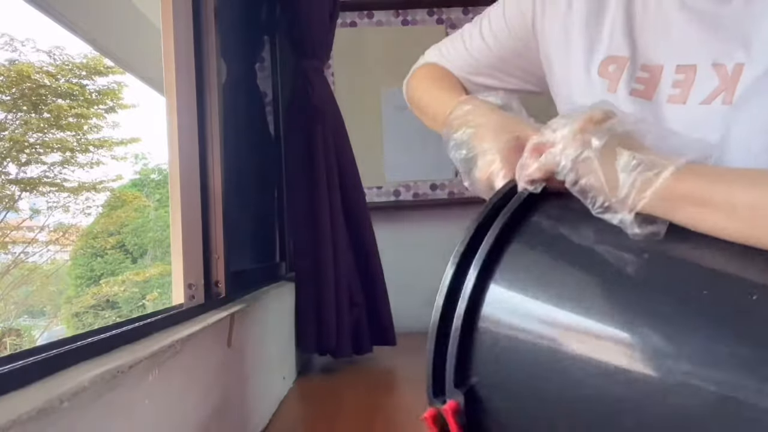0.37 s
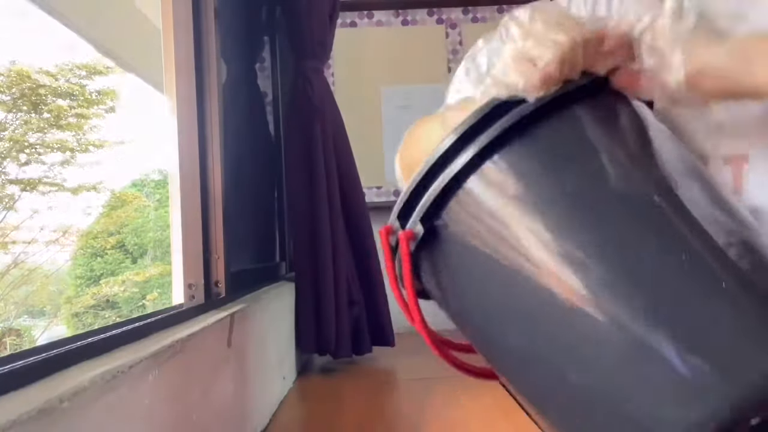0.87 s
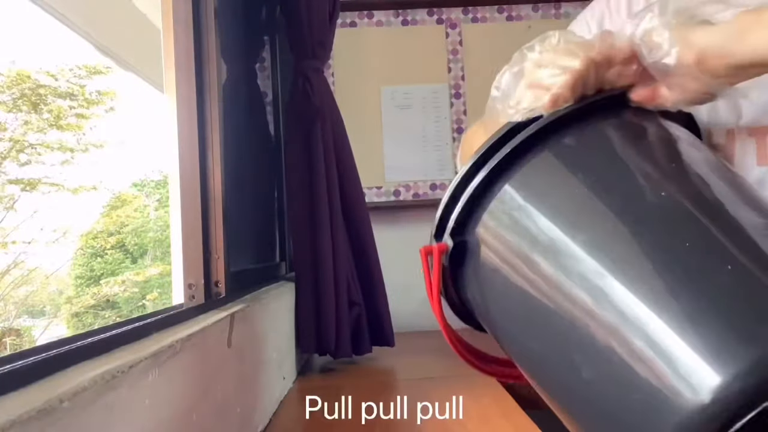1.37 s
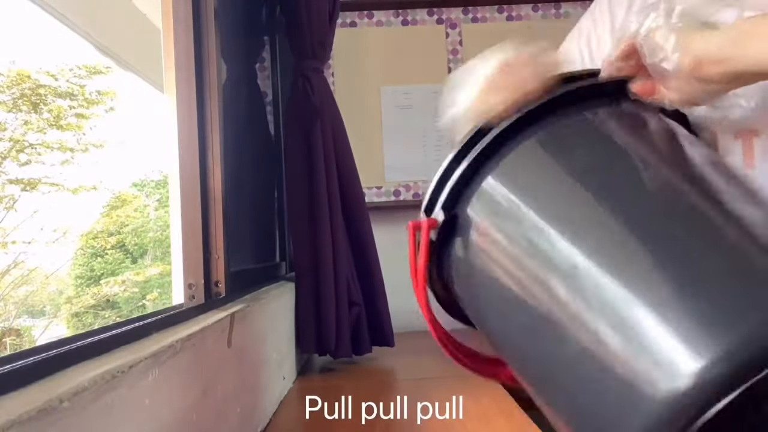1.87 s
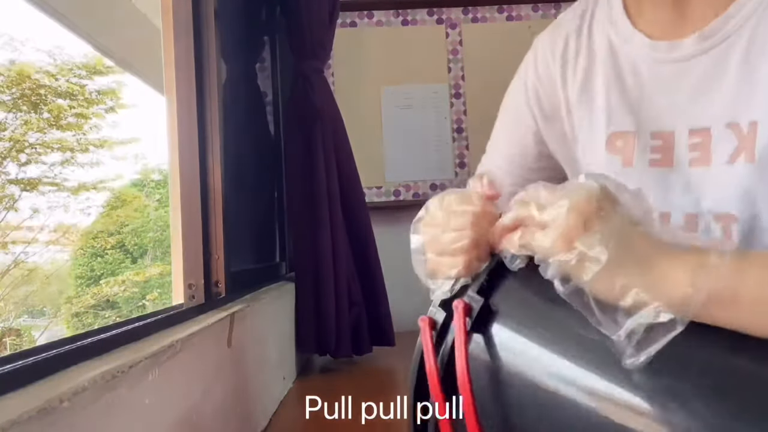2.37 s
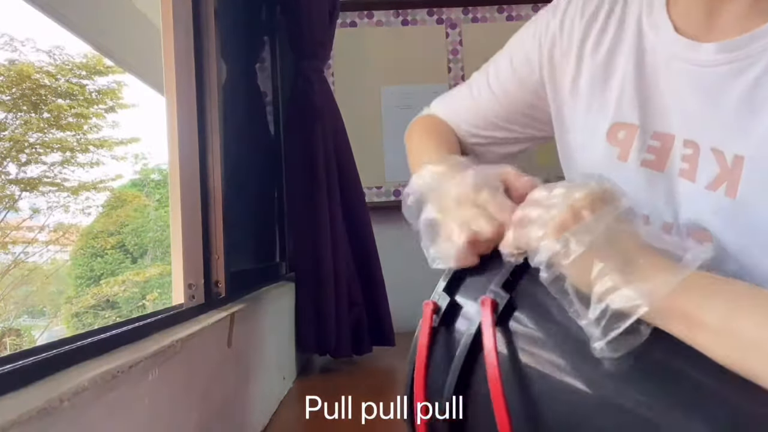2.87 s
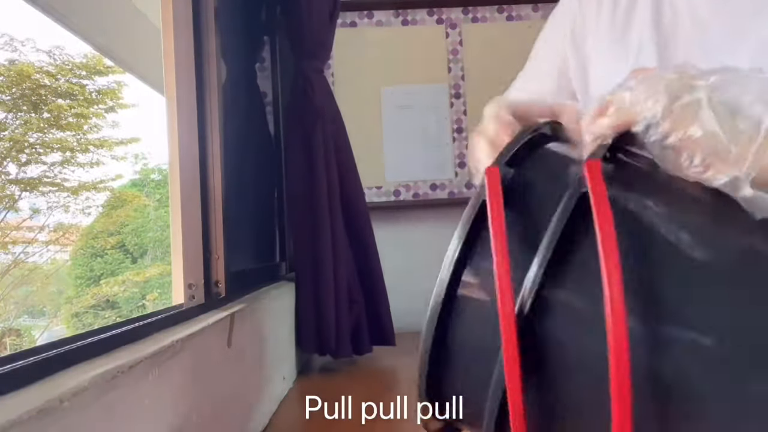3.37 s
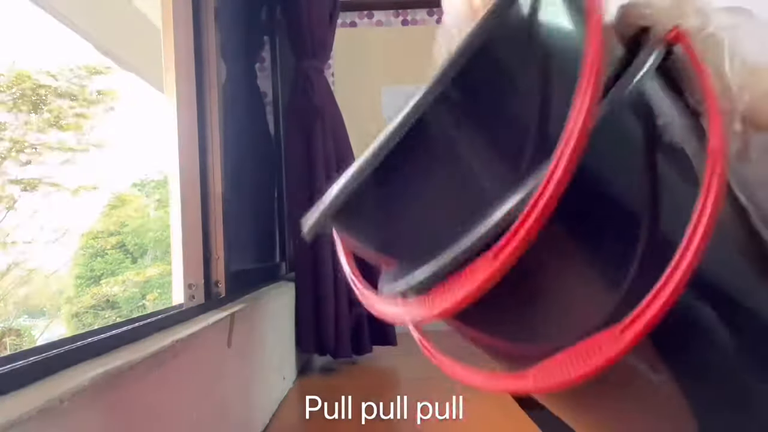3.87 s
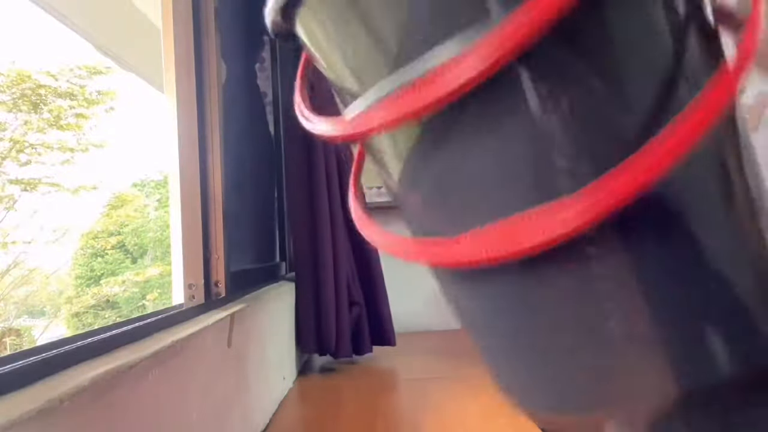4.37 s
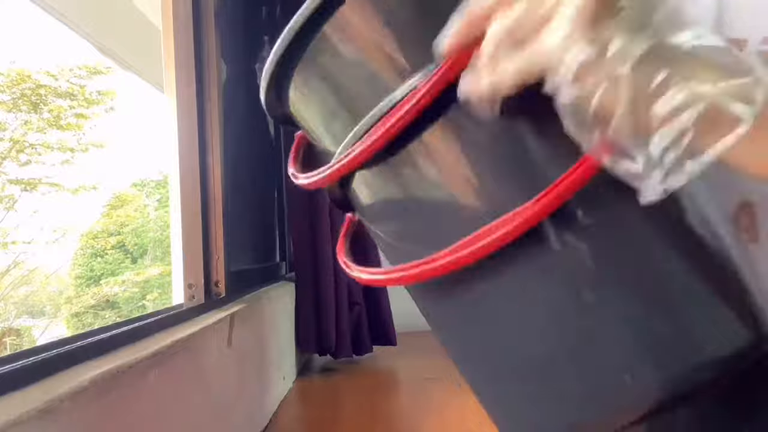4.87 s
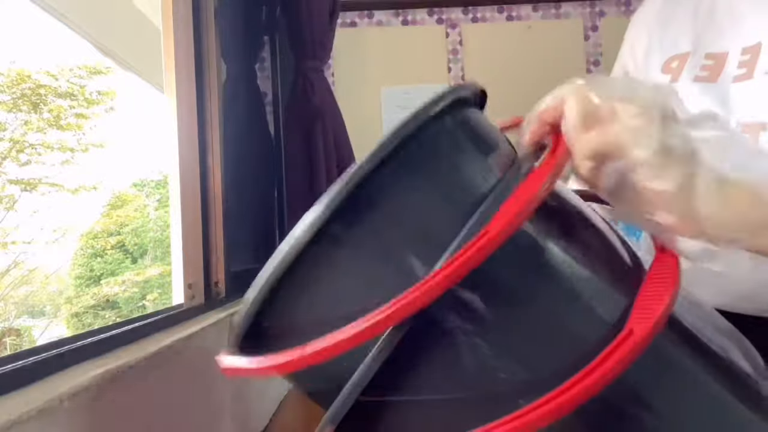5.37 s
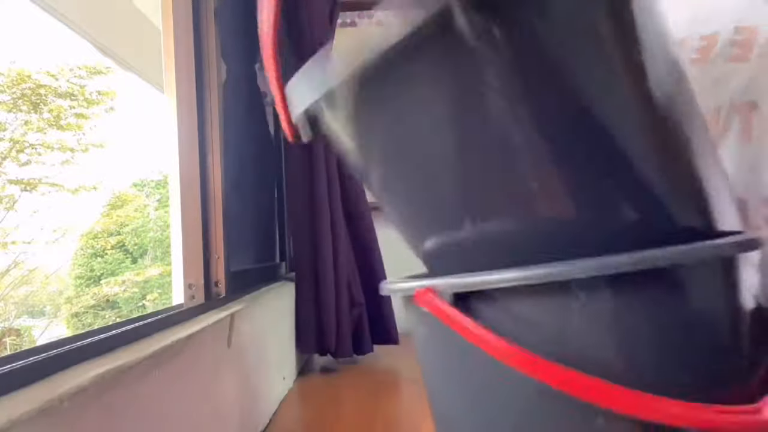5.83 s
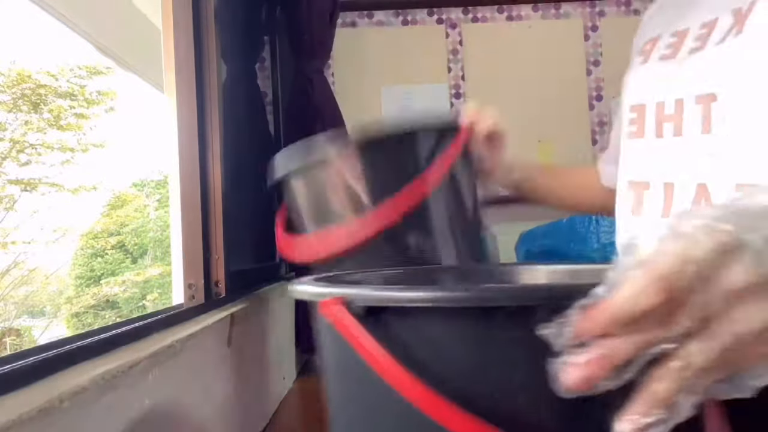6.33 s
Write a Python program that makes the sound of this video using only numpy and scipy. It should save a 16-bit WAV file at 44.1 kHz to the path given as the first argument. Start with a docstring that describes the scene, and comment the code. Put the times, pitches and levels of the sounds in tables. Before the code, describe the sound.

A close stereo phone pickup on a wooden table in a small, briefly echoing room, with low traffic wash through an open window. The end of a faint, wavering far horn fades by 0.45 s. Gloved hands rustle on plastic; bright clicks cluster at 0.23 s, with thin film crackle near 0.6 s. Light rubbing and scuffs follow, with dull taps at 1.15 s and snaps around 2.25 s. After quieter tugging, a hollow knock lands at 3.46 s and a sharp clack at 3.59 s. From 4.18 to 4.75 s handles and rims rattle in quick boomy knocks amid rustling. A low table thud comes at 5.13 s. A hard, bright clack hits at 5.88 s, a deep thud at 5.95 s, a knock at 6.16 s, then the loudest hollow bangs at 6.41 and 6.54 s, before an abrupt stop around 6.62 s.

```python
"""Hands in thin plastic gloves pull two nested plastic buckets apart on a wooden table by an open window.
Rims and handles snap in short noise bursts with ringing tones; hollow walls and table boom in decaying sines.
Filtered noise makes the rubbing, glove rustle and street wash; wavering sines make the end of a far horn note.
A phone with two microphone ports stands on the table: the ports differ in level and treble timing."""
import sys
import numpy as np
from scipy import signal
from scipy.fft import rfft, irfft, next_fast_len
from scipy.io import wavfile
from scipy.ndimage import uniform_filter1d

SR = 44100
rng = np.random.default_rng(int(sys.argv[2]) if len(sys.argv) > 2 else 0)


def transcribe(u):
    """Save the signal u as a 16-bit wav file named by the first command-line argument.

    u: samples, shape (n,) or (channels, n), limited to [-1, 1]; the rate is SR.
    q: integer samples, one column per channel.
    """
    v = np.clip(np.atleast_2d(u).T, -1, 1)
    q = np.round(v * 32767).astype(np.int16)
    wavfile.write(sys.argv[1], SR, q)


def convert_level_to_amplitude(level_db):
    """Map a level in decibels to its linear amplitude factor."""
    exponent = np.asarray(level_db, float) / 20
    return 10 ** exponent


N = 296352  # length in samples

# rims and handles snapping: (time [s], nominal clatter peak [dB], colour [Hz],
# treble against that peak [dB], decay time [ms])
RIM_SNAPS = [(0.223, -32.5, 2900, 5.5, 6.7), (0.228, -25.5, 2750, -3, 3.6), (0.2335, -26, 4940, 13.5, 1.2),
             (0.2347, -20, 4900, 5, 1.2), (0.237, -20.5, 2750, -7.5, 2.1), (0.533, -30, 1370, 2.5, 3.3),
             (0.604, -32, 1460, 1.5, 3.5), (0.767, -33.5, 1750, 4, 5.7), (1.1495, -23.5, 1500, -28, 2),
             (1.154, -28, 1500, -30, 2), (2.122, -40, 1350, 5.5, 5.5), (2.231, -22, 1210, 3.5, 2.46),
             (2.269, -17.5, 1200, -5, 1.2), (2.277, -18, 810, -15, 2.8), (2.955, -35.5, 1260, 7.5, 4.2),
             (3.457, -32.5, 1260, 0, 6.3), (3.581, -24.5, 900, -2, 2.5), (3.5884, -13, 1940, -7, 2.8),
             (3.592, -24.5, 3380, -1, 2.2), (3.763, -29.5, 2350, -7.5, 3.4), (4.005, -34.5, 2730, -7, 3.7),
             (4.017, -28.5, 3500, 0, 3.7), (4.182, -24.5, 940, 3, 4.7), (4.188, -19.5, 1480, -5, 3.2),
             (4.231, -18, 1710, -4, 2.6), (4.244, -22, 1800, -3, 1.5), (4.43, -18, 1230, -29, 2.6),
             (4.444, -29.5, 2490, -8, 1.8), (4.4893, -20.5, 1850, 2.5, 3), (4.495, -21, 2800, -20, 1.1),
             (4.543, -31, 1370, -12, 5), (4.678, -30, 1940, -9.5, 4.3), (4.738, -24, 1270, -4, 4.2),
             (4.745, -19.5, 1230, -12.5, 0.4), (4.79, -36.5, 1240, 5, 4), (5.127, -18.5, 1420, -10.5, 0.94),
             (5.464, -39.5, 1040, 7, 11), (5.591, -31, 1370, -28, 8.6), (5.608, -25, 1080, -19.5, 3.5),
             (5.751, -23.5, 1280, -8.5, 6.1), (5.828, -26, 1880, -17.5, 3), (5.87, -29, 1130, -20.5, 4.5),
             (5.8805, -14, 2700, 3, 1.8), (5.882, -11, 1670, -8, 2.7), (5.884, -17.5, 800, -17, 3.1),
             (5.945, -23, 1050, -27.5, 5.6), (5.979, -23.5, 1750, -20, 2.8), (6.071, -36.5, 1480, 7, 6),
             (6.157, -14, 1230, -41, 1.54), (6.407, -9, 880, -3, 2.13), (6.492, -29, 3640, -3, 1.5),
             (6.544, -10.5, 1380, -1, 3.05), (6.544, -17, 630, -32.5, 5.2)]
# gripping and sliding on the bucket: (time [s], level [dB])
GRIP = [(0.0, -33.5), (0.42, -42.5), (1.05, -36.5), (1.21, -40.5), (1.6, -41), (2.04, -38.5), (2.48, -35.5),
        (2.66, -38.5), (2.94, -37.5), (3.31, -38.5), (3.58, -32.5), (3.95, -35), (4.56, -38), (4.87, -37),
        (5.09, -40.5), (5.81, -30), (6.1, -39), (6.6, -26.5)]


def read(points, hz):
    """Reads a curve between its points, along a log-frequency axis."""
    f, value = np.transpose(points)
    return np.interp(np.log(hz + 1), np.log(f + 1), value)


def evened(x):
    """Scales to rms 1."""
    return x / np.sqrt(np.mean(x ** 2) + 1e-20)


def add(mix, s, sound, pan_db):
    """Adds a sound to the mix at s seconds; the left side is pan_db louder than the right."""
    part = mix[:, round(s * SR):][:, :len(sound)]
    sides = convert_level_to_amplitude(np.array([[pan_db / 2], [-pan_db / 2]]))
    part += sides * sound[:part.shape[1]]


def colour(x, spectrum):
    """Filters by a spectrum in dB."""
    size = next_fast_len(N)
    gain = convert_level_to_amplitude(read(spectrum, np.fft.rfftfreq(size, 1 / SR)))
    return irfft(rfft(x, size) * gain, size)[..., :N]


def band(x, lo_hz, hi_hz):
    """Keeps the sound between two frequencies."""
    return signal.sosfilt(signal.butter(2, [lo_hz, hi_hz], "band", fs=SR, output="sos"), x)


def lumps(per_s):
    """A slow random curve of rms 1, from per_s random points a second."""
    return evened(signal.resample(rng.standard_normal(round(per_s * N / SR)), N))


def pair(a, b):
    """Mixes two unrelated noises to a set left-right likeness at each frequency."""
    # (frequency [Hz], left-right likeness [0 to 1])
    likeness = [(30, .15), (270, .45), (450, .05), (7000, .1), (8300, .75), (9200, .98), (11500, .75),
                (14700, .97), (15600, .5)]
    size = next_fast_len(N)
    same = np.clip(read(likeness, np.fft.rfftfreq(size, 1 / SR)), 0, 1)
    a, b = rfft(a, size), rfft(b, size)
    right = same * a + np.sqrt(1 - same ** 2) * b
    return irfft(np.array([a, right]), size)[:, :N]


def snaps():
    """A snap is a clatter of rim and handle, a short ring, a hard first tick and a bright crack on top."""
    pan_spread_db = 6.0  # snaps land at chance places around the rim
    rim_db, detune = -22, .04  # the grip bends the rim a little differently each time
    crack_low_hz, crack_high_hz = 2900, 12700
    mix, t = np.zeros((2, N)), np.arange(4096) / SR
    tick = band(1. * (t == 0), 900, crack_high_hz)  # the first contact
    tick /= abs(tick).max()
    for s, db, hz, treble_db, ms in RIM_SNAPS:
        noise = rng.standard_normal(4096)
        place, bend = rng.standard_normal(2)
        # brighter snaps carry more upper clatter
        rattle = clatter(noise, hz, ms, 2.5 + 0.58 * min(treble_db, 0))
        ringing = convert_level_to_amplitude(rim_db) * rim(noise, hz, ms, .16, 1 + detune * bend)
        add(mix, s, convert_level_to_amplitude(db) * (rattle + ringing), pan_spread_db * place)

        crack = band(noise * np.exp(-t / .0012), crack_low_hz, crack_high_hz)
        crack /= abs(crack).max()
        tick_db = 8.5 + 0.1 * db  # against the crack: harder blows tick more
        add(mix, s, convert_level_to_amplitude(db + treble_db) * (crack - convert_level_to_amplitude(tick_db) * tick), pan_spread_db / 3 * place)
    return mix


def plucks():
    """A very short pluck leaves a rim or handle ringing clearly."""
    # (time [s], peak level [dB], favoured pitch [Hz])
    clear_rings = [(0.2305, -26, 2950), (0.2363, -15, 2720), (0.2565, -34, 2720), (4.431, -25, 1240),
                   (4.49, -22, 1790), (5.882, -25.5, 1830), (6.158, -28.5, 1240)]
    mix = np.zeros((2, N))
    for s, db, hz in clear_rings:
        ringing = rim(rng.standard_normal(4096), hz, 1.2, .035)
        add(mix, s, convert_level_to_amplitude(db) * ringing, 3 * rng.standard_normal())
    return mix


def clatter(noise, hz, ms, edge_db):
    """A ragged burst of micro-impacts in stiff plastic: low wall sound lasts longest, the edge dies soonest."""
    ms = max(ms, .3)
    turns = np.arange(len(noise)) / SR * 1000 / ms  # time counted in decay times
    hit = noise * (1 - np.exp(-turns * 6)) ** 2
    middle = band(band(hit * np.exp(-turns), hz / 1.28, hz * 1.26), hz / 1.5, hz * 1.5)
    # snaps of higher colour shake the hollow walls less
    walls = 0.5 * min(1740 / hz, 1) ** 2 * band(hit * np.exp(-turns / 2.0), 270, 1260)
    edge = convert_level_to_amplitude(edge_db) * band(hit * np.exp(-turns * 2.26), 440, 3860)
    sound = middle + walls + edge
    crest = 2.025  # assumed peak over rms, to bring the peak near 1
    return sound / (crest * np.sqrt(np.sum(sound ** 2) / (ms * SR / 1000)))


def rim(noise, favoured_hz, ms, reach_octaves, stretch=1):
    """A noise burst sets ringing those natural tones of rim and handle that lie near its colour."""
    # (pitch [Hz], strength [dB], time to fall by 60 dB [s])
    rim_tones = [(950, -2, .06), (1240, 0, .04), (1370, 0, .03), (1690, 0, .05), (1790, -2, .04),
                 (2140, -3, .04), (2455, -2, .05), (2700, 0, .028), (2950, 0, .025)]
    t = np.arange(len(noise)) / SR
    ringing = np.zeros(len(t))
    for hz, db, t60 in rim_tones:
        miss = np.log2(hz / favoured_hz) / reach_octaves
        ringing += convert_level_to_amplitude(db - 60 * t / t60 - miss ** 2) * np.sin(2 * np.pi * hz * stretch * t)
    burst = noise * np.exp(-t * 1000 / max(ms, .3))
    sound = signal.fftconvolve(burst, ringing)[:len(t)]
    return sound / abs(sound).max()


def booms():
    """Blows into the hollow body make it sound at a few low pitches."""
    # (time [s], peak level [dB], favoured pitch [Hz], free ringing [factor on decay time])
    blows = [(0.34, -34.5, 210, 1.2), (0.544, -27, 196.6, 1.4), (0.761, -35, 185, 1.3),
             (0.889, -31, 168, 1), (0.924, -33, 669, 0.4), (0.211, -30, 100, 0.24), (1.128, -37, 376, 0.85),
             (1.149, -34.5, 330, 0.38), (1.724, -35.5, 213, 1.8), (2.025, -29.5, 168, 1.1),
             (2.106, -31, 214, 0.47), (2.233, -24.5, 334, 0.48), (2.268, -26, 273, 0.74),
             (2.949, -29, 220, 0.95), (3.461, -11, 250, 0.64), (3.578, -19, 250, 0.44),
             (3.596, -15, 212, 0.32), (3.753, -21.5, 221, 0.42), (4.001, -31, 213, 0.73),
             (4.186, -16.5, 280, 0.39), (4.193, -8.5, 226.2, 0.44), (4.231, -19, 309, 0.63),
             (4.24, -16.5, 226.5, 0.99), (4.432, -23.5, 174, 0.4), (4.493, -13.5, 220.3, 1.15),
             (4.738, -22.5, 196.7, 1.05), (5.135, -16.5, 192.5, 0.2), (5.335, -29.5, 228.3, 0.89),
             (5.739, -23.5, 193, 0.54), (5.881, -19.5, 303, 0.41), (5.949, -19.5, 314, 0.17),
             (6.157, -11.5, 233, 0.59), (6.399, -21, 212, 0.43), (6.408, -6.5, 403, 0.6),
             (6.407, -18.5, 860, 0.47), (6.408, -21, 669, 0.66), (6.41, -13.5, 403, 1.65),
             (6.412, -18, 210, 1.3), (6.537, -16.5, 250, 0.28), (6.543, -22.5, 669, 0.42),
             (6.546, -15, 403, 1.13), (6.546, -5, 280, 0.58), (6.551, -18.5, 166, 0.83)]
    mix = np.zeros((2, N))
    for s, db, hz, free in blows:
        # blows land all round buckets that bend in the grip
        place, bend = rng.standard_normal(2)
        hollow = struck(hz, free, 0.035, -20, 1 + .004 * bend)
        add(mix, s, convert_level_to_amplitude(db) * hollow, 0.65 + 2.5 * place)
    return mix


def thuds():
    """The buckets' weight thuds into the table top, which answers low and broadly."""
    # (time [s], peak level [dB], favoured pitch [Hz])
    table_blows = [(1.141, -26.5, 110), (1.451, -26, 44), (2.232, -27, 124), (2.267, -27, 80),
                   (2.436, -25.5, 59), (3.04, -26.5, 125), (3.463, -29, 106), (3.707, -24.5, 74.6),
                   (4.425, -31, 149), (4.739, -42, 84), (5.135, -13.5, 74.3), (5.741, -28, 97),
                   (5.884, -17.5, 84.3), (5.951, -11, 83), (6.159, -17, 112), (6.412, -10.5, 119.3),
                   (6.544, -16, 127.4)]
    mix = np.zeros((2, N))
    for s, db, hz in table_blows:
        place, bend = rng.standard_normal(2)
        thud = struck(hz, .55, 0.13, -28.5, 1 + .004 * bend)
        add(mix, s, convert_level_to_amplitude(db) * thud, .6 + 2.5 * place)
    return mix


def struck(hz, free, width, others_db, stretch):
    """The walls take a few ms to start moving; the ring is scaled to peak 1."""
    rise = 1 - np.exp(-np.arange(SR // 3) / SR / .002)
    sound = rise * ring(hz, free, width, others_db, stretch)
    return sound / abs(sound).max()


def ring(favoured_hz, free, width_octaves, others_db, stretch=1):
    """A blow favours natural tones near one pitch; the rest start weakly; closing hands hasten the decay."""
    # buckets and table top: (pitch [Hz], strength [dB], time to fall by 60 dB [s])
    body_tones = [(50.9, -12, 0.29), (62.4, -5.5, 0.18), (102.1, -0.5, 0.092), (132.7, -6, 0.25),
                  (165.2, 1, 0.059), (210.1, 5, 0.091), (250, -2, 0.063), (297.8, 5, 0.087),
                  (323, -12, 0.28), (403, 2, 0.066), (503, -9, 0.052), (669, 3.5, 0.035),
                  (860, -14.5, 0.08), (1200, -13, 0.076)]
    t = np.arange(SR // 3) / SR
    sound = np.zeros(len(t))
    for k, (hz, db, t60) in enumerate(body_tones):
        favoured = convert_level_to_amplitude(-(np.log2(hz / favoured_hz) / width_octaves) ** 2)
        start = favoured + (-1) ** k * convert_level_to_amplitude(others_db)  # the weak part alternates in sign
        fall_db = 60 * (t / (t60 * max(free, .2))) ** 1.86  # slow at first, then faster
        sound += convert_level_to_amplitude(db - fall_db) * np.sin(2 * np.pi * hz * stretch * t) * start
    return sound


def grip_level():
    """Strength of the grip over time, as an amplitude."""
    return convert_level_to_amplitude(np.interp(np.arange(N) / SR, *np.transpose(GRIP)))


def rub():
    """Gripping and sliding shake the body in lumps: uneven noise drives its natural tones."""
    shake = rng.standard_normal((2, N)) * convert_level_to_amplitude(4.5 * lumps(25))
    shake = shake + 0.033 * shake[::-1]  # a little of each side in the other
    sound = signal.fftconvolve(shake, ring(171.0, 0.99, 0.34, -13)[None], axes=1)[:, :N]
    return grip_level() * evened(sound)


def scuffs():
    """Fingers slip on the rim: many faint ticks, louder under a firmer grip."""
    out = np.zeros((2, N))
    for hz in np.geomspace(600, 3000, num=8):
        slips = rng.random((2, N)) < 30 / SR  # about 30 a second at each pitch
        size = convert_level_to_amplitude(3 * np.minimum(rng.exponential(1, (2, N)), 3)) * slips
        tick = clatter(rng.standard_normal(1024), hz, 16.0, -5.0)
        out += signal.oaconvolve(size, tick[None])[:, :N]
    return convert_level_to_amplitude(-16.0) * grip_level() * evened(out)


def gloves():
    """Thin film hisses, and crackles as its folds give way in clumps."""
    # glove film: (frequency [Hz], relative level per Hz [dB])
    film_colour = [(500, -14.5), (1500, -1), (3000, -1), (5000, -4.5), (8000, 2), (12000, -1), (16000, -2),
                   (16400, -40.5)]
    folds = rng.random(N) < 300 * convert_level_to_amplitude(6 * lumps(30)) / SR
    crackle = convert_level_to_amplitude(3.2 * np.minimum(rng.exponential(1, N), 5)) * folds
    film = rng.standard_normal((2, N)) * (1 + 5 * abs(uniform_filter1d(crackle, size=30)) ** .5)
    rustle = colour(pair(*film), film_colour) * convert_level_to_amplitude(2.0 * lumps(40))
    return glove_level() * evened(rustle)


def glove_level():
    """Each move swells fast, holds and fades; the rustle also swells for a few ms around each crack."""
    # moves of the gloved hands: (start [s], held for [s], rustle level [dB])
    hand_moves = [(0.0, 0.03, -49.5), (0.224, 0.017, -45), (0.4, 0.094, -48.5), (0.605, 0.02, -41),
                  (0.68, 0.17, -56), (1.01, 0.031, -55), (1.18, 0.17, -57), (1.73, 0.45, -51),
                  (2.3, 0.088, -55), (2.44, 0.3, -50), (3.201, 0.094, -48), (3.35, 0.077, -46.5),
                  (3.789, 0.056, -49.5), (3.92, 0.14, -51.5), (4.15, 0.15, -47.5), (4.43, 0.21, -42.5),
                  (4.7, 0.17, -44), (4.93, 0.28, -50.5), (5.3, 0.039, -46), (5.42, 0.29, -51),
                  (5.77, 0.067, -44.5), (5.91, 0.11, -42.5), (6.23, 0.15, -50.5), (6.46, 0.067, -51.5),
                  (6.56, 0.099, -47.5)]
    rise_db_per_s, fall_db_per_s = 405, 108.5
    swell_db, swell_rise_s, swell_fall_s = -11.5, 0.0031, 0.0017
    t = np.arange(N) / SR
    moves, swells = np.zeros(N), np.zeros(N)
    for s, held, db in hand_moves:
        early, late = np.maximum(s - t, 0), np.maximum(t - s - held, 0)
        moves += convert_level_to_amplitude(db - rise_db_per_s * early - fall_db_per_s * late) ** 2
    for s, db, _, treble_db, _ in RIM_SNAPS:
        shape = np.exp(np.minimum((t - s) / swell_rise_s, (s - t) / swell_fall_s))
        swells += convert_level_to_amplitude(db + treble_db + swell_db) * shape
    return np.sqrt(moves + swells ** 2)


def room(x):
    """The room sends back sparse echoes of random sign, each frequency dying at its own speed."""
    # (frequency [Hz], time to fall by 60 dB [s])
    echo_decay = [(100, 0.16), (500, 0.18), (2000, 0.15), (8000, 0.12)]
    length = SR // 2
    taps = np.zeros((2, length))
    # one echo at a random place in every 20 samples
    at = np.arange(200, length - 20, 20) + rng.integers(0, 20, (2, (length - 201) // 20))
    np.put_along_axis(taps, at, rng.choice([-1., 1.], at.shape), 1)
    left, right = np.pad(taps, ((0, 0), (0, N)))
    hz, t, z = signal.stft(pair(left, right)[:, :length], SR, nperseg=256)
    fall = convert_level_to_amplitude(-60 * t / np.maximum(read(echo_decay, hz), .03)[:, None])
    tail = signal.istft(z * fall, SR, nperseg=256)[1]
    return signal.fftconvolve(x.mean(0)[None], tail / np.linalg.norm(tail[0]), axes=1)[:, :N]


def street():
    """Many distant traffic sounds blend into a wash of coloured noise that swells slowly."""
    # through the window: (frequency [Hz], relative level per Hz [dB])
    wash_colour = [(15, -29), (30, -2.5), (100, -1.5), (220, 2), (320, -6), (480, -14.5), (740, -7),
                   (1000, -12.5), (2100, -20), (4500, -41), (8000, -34), (16000, -37.5), (16400, -86)]
    wash = evened(colour(pair(*rng.standard_normal((2, N))), wash_colour))
    return wash * convert_level_to_amplitude(-38.5 + 0.16 * lumps(2.8))


def horn():
    """The end of a far horn note: a few sines that waver together in pitch and separately in level."""
    # (pitch [Hz], rms level before wavering [dB], heard until [s])
    horn_tones = [(417, -50, 0.33), (829.0, -51, 0.45), (1363, -62.5, 0.4)]
    t = np.arange(N) / SR
    warped = np.cumsum(1 + 0.006 * lumps(12)) / SR  # uneven time bends the pitch
    sound = np.zeros(N)
    for hz, db, end in horn_tones:
        tone = np.sqrt(2) * np.sin(2 * np.pi * hz * warped)
        fade = np.clip((end - t) / 0.15, 0, 1)
        sound += convert_level_to_amplitude(db + 4.5 * lumps(30.0)) * tone * fade
    return sound


def scene():
    """Knocks with their room echoes, then handling, street and horn."""
    high = snaps() + plucks()
    low = booms() + thuds()
    echoes = room(convert_level_to_amplitude(-9.0) * low + convert_level_to_amplitude(-11.5) * high)
    return high + low + echoes + rub() + scuffs() + gloves() + street() + horn()


def roll_off(x):
    """The treble ends steeply here."""
    return signal.sosfilt(signal.butter(12, 16660, fs=SR, output="sos"), x)


def record(dry):
    """The spaced ports differ in level and treble phase; the phone stops listening just before the end."""
    # (frequency [Hz], phase by which the right port leads [radians])
    right_lead = [(0, 0), (5500, .3), (9200, 3.14), (12000, 6.28), (14700, 9.42), (16500, 11.5)]
    # (frequency [Hz], level of the left port over the right [dB])
    left_over_right = [(60, 1), (270, 2), (740, .5), (5500, 1), (9000, 0)]
    stop_s, fade_s = 6.62, 0.0006
    size = next_fast_len(N + 512)
    hz = np.fft.rfftfreq(size, 1 / SR)
    # each port takes half of the difference
    half = convert_level_to_amplitude(read(left_over_right, hz) / 2) * np.exp(-.5j * np.interp(hz, *np.transpose(right_lead)))
    ports = irfft(rfft(dry, size) * np.array([half, 1 / half]), size)[:, :N]
    finished = ports * np.clip((stop_s - np.arange(N) / SR) / fade_s, 0, 1)
    return roll_off(finished)


dry = scene()
out = record(dry)
transcribe(out)
```